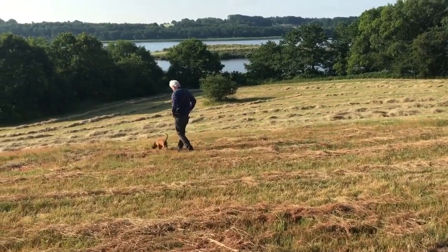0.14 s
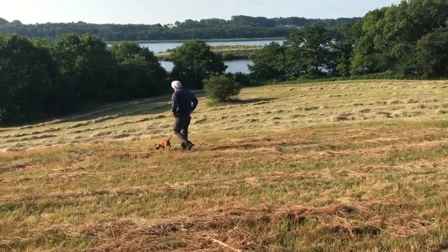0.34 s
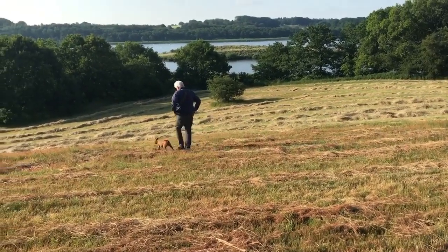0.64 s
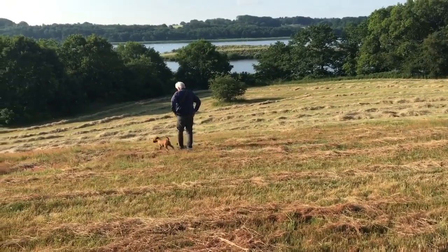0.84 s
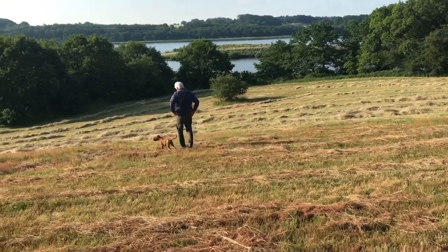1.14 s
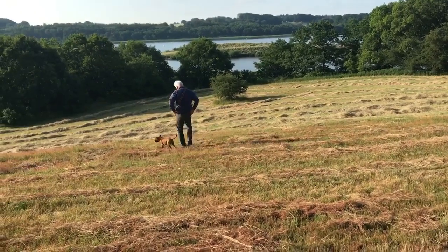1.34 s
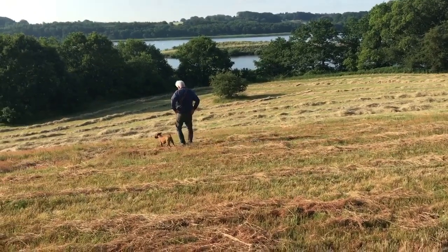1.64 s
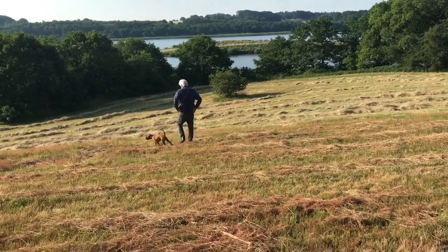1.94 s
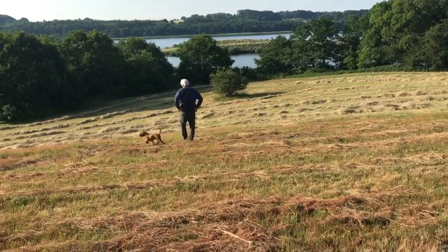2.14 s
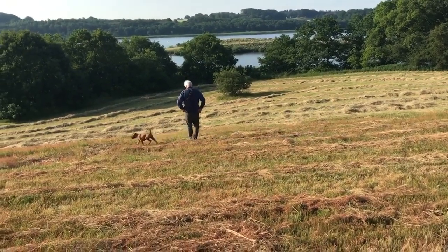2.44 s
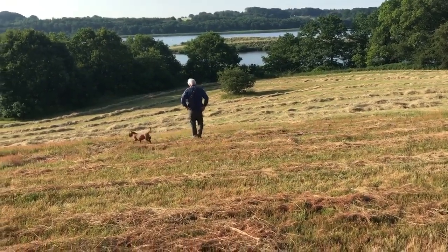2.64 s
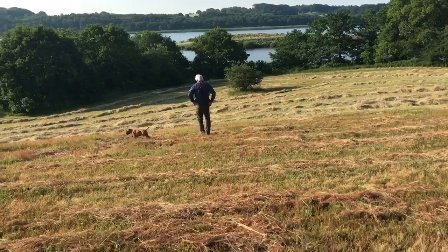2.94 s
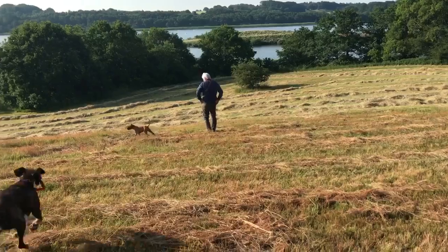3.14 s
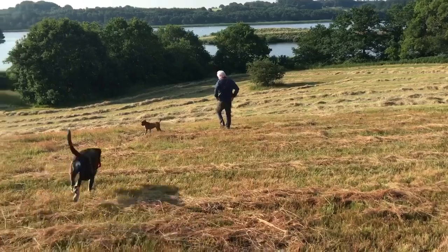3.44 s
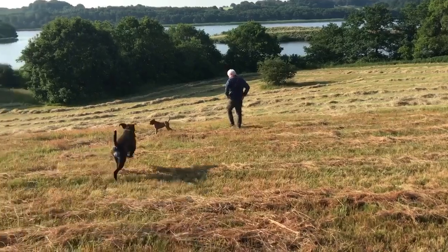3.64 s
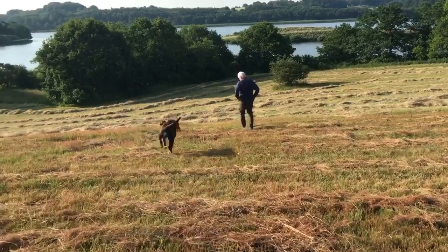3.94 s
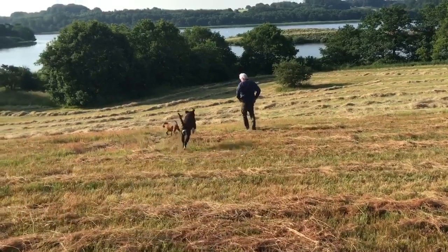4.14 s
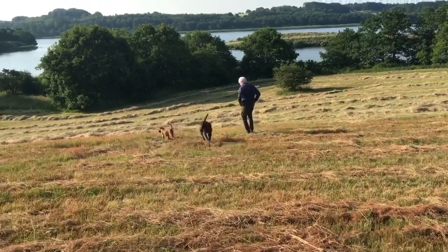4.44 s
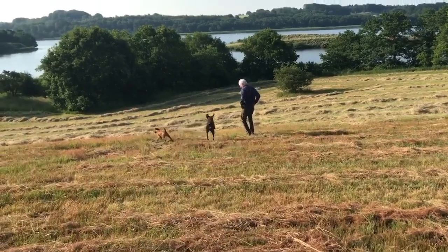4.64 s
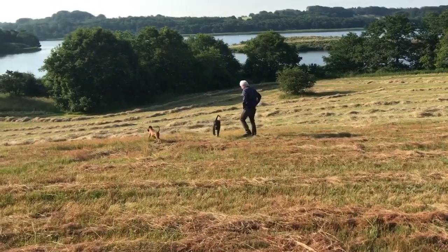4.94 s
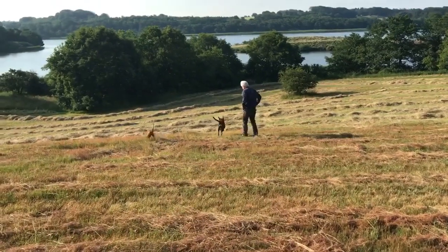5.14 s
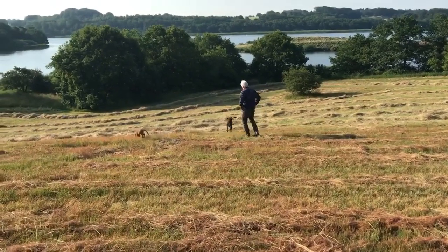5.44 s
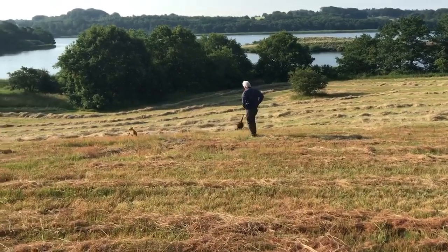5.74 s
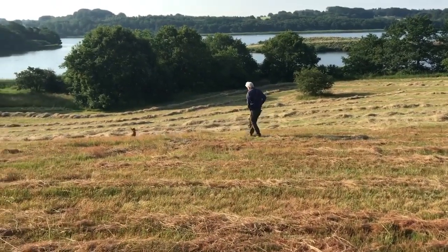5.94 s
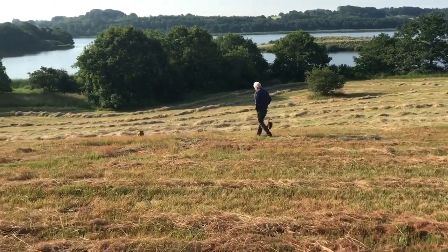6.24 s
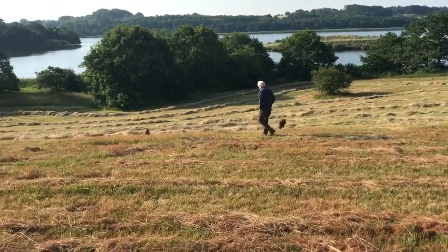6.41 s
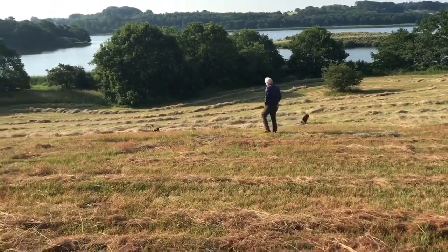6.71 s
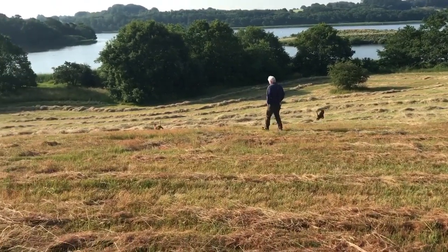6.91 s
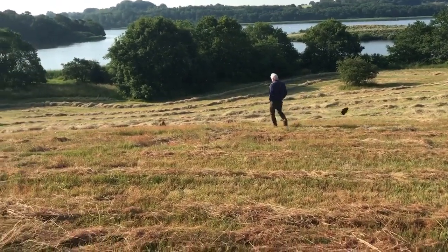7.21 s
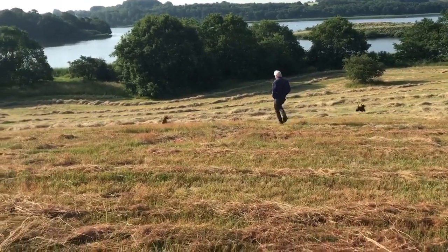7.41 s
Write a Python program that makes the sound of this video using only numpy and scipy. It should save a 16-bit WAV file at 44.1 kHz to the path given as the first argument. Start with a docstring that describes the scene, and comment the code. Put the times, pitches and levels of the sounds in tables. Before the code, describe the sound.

A quiet open field, heard in mono with a slightly dull top. Throughout, a soft wash of air and leaf hiss lies under a distant gull colony, a blurred clamour around the upper midrange with hoarse, falling cries. A far water bird gives short yelps in the first second and again around 3 to 4 s; thin songbird notes chirp here and there, weakly echoing off trees. Low wind flutters lightly at first. From about 2.3 to 2.6 s a dog's paws thud and crunch close by, dry stems cracking rapidly; its rhythmic swish peaks near 2.9 s and recedes. Wind rises from 3 s, with deep bumps, and booms heavily at 4.2 to 4.6 s. It eases after 5.2 s while gulls cry on. Small birds twitter more densely around 6.4 to 6.9 s; renewed gusts thump at 6.8 to 7.1 s, and rumble continues to the end at 7.5 s.

```python
"""Hay field above a river

Wind rumbles and bumps on the microphone: filtered noise follows the flow, and single eddies are pressure swings.
A far colony of gulls clamours on the water, as blurred gliding tones over a wash of shaped noise.
Small birds chirp in rustling trees, as thin tones that echo weakly, over patchy bands of noise.
A dog bounds past through the dry hay, as random clicks that swish, thud and crunch, with stems cracking."""
import sys
import numpy as np
from scipy import signal
from scipy.io import wavfile
from scipy.ndimage import uniform_filter1d, map_coordinates

SR = 44100
rng = np.random.default_rng(int(sys.argv[2]) if len(sys.argv) > 2 else 0)


def to_wav(s):
    """Save 16-bit WAV."""
    ch = np.atleast_2d(s).T  # columns
    pcm = np.round(np.clip(ch, -1, 1) * 32767)  # PCM
    wavfile.write(sys.argv[1], SR, pcm.astype(np.int16))


N = 333881
TIME = np.arange(N) / SR

# low wash of the open air: (time [s], level before the scene's trim [dB])
AIR_LEVEL = [(0, -60), (.6, -58.5), (1.3, -59.5), (2.3, -59.5), (2.8, -56.5), (3.5, -56.5), (4.5, -57),
             (5.3, -57.5), (6.5, -57.5), (7.57, -59)]
# colour of the air: (frequency [Hz], density [dB per Hz, relative])
AIR_COLOUR = [(100, -7.5), (200, -11), (320, -8.5), (430, -14.5), (600, -2.5), (800, -7), (1000, 2),
              (1300, -4), (2000, 2), (3000, -25)]
# a faint far drone: (time [s], level [dB])
DRONE_LEVEL = [(0, -70.5), (.8, -70.5), (2.2, -68), (3.2, -73.5), (4.5, -82.5), (7.57, -77.5)]
# colour of the drone: (frequency [Hz], density [dB per Hz, relative])
DRONE_COLOUR = [(130, 1), (170, 3.5), (240, -2.5), (330, 3.5), (420, -7.5)]
# swells of rustling in the trees: (time of peak [s], length [s], level before the scene's trim [dB])
RUSTLES = [(.37, 0.9, -63), (3.57, 0.36, -60.5), (5.1, 0.68, -60.5), (5.7, 0.56, -62), (6.25, 0.49, -59.5),
           (6.76, 1, -61), (7.08, 0.4, -59.5)]
# colour of the leaves: (frequency [Hz], density [dB per Hz, relative])
LEAF_COLOUR = [(1500, -3.5), (2600, 6), (3300, 1.5), (4000, 4), (4600, 3.5), (5000, -2.5), (5700, -2.5),
               (6500, -13), (7200, -14), (7800, -19), (9000, -22)]
# clamour of the gull colony: (time [s], gain on cries and wash [dB])
CLAMOUR = [(0, -50.5), (.35, -51.5), (.75, -55.5), (1.55, -55), (1.8, -51), (2.4, -53.5), (3.3, -51),
           (4.2, -53), (4.8, -49), (5.5, -53.5), (6.2, -50.5), (6.8, -51.5), (7.57, -51.5)]
# colour of the colony's wash: (frequency [Hz], density [dB per Hz, relative])
COLONY_COLOUR = [(1000, -33), (1350, -8), (1600, 1.5), (1830, 3), (2150, -1), (2500, -16), (3200, -39.5),
                 (4500, -44)]
# a blurred burst of twittering: (time [s], level before flutter [dB])
CHATTER = [(0, -94), (6.3, -80), (6.6, -71), (6.78, -56.5), (6.88, -65.5), (7.1, -74.5), (7.57, -69)]
# nearer gulls: (start [s], length [s], starting pitch before the bend [Hz], level [dB], rasp [ratio])
GULLS = [(0.02, 0.2, 1730, -64, .9), (0.1, 0.28, 2127, -57, .7), (0.43, 0.23, 1930, -60, .7),
         (0.75, .16, 2020, -60, .7), (1.04, 0.21, 1740, -59.5, .9), (1.2, 0.32, 1946, -58, .7),
         (1.38, 0.13, 1866, -55, .5), (1.6, 0.19, 1926, -59.5, 1.2), (2.15, .25, 1670, -56, .8),
         (2.7, 0.42, 1690, -56, .9), (2.92, 0.2, 2200, -58, 1.8), (3.08, 0.46, 1883, -55.5, .6),
         (3.4, 0.3, 1740, -57, .7), (3.35, 0.28, 1437, -60.5, 1), (3.82, 0.24, 1606, -58.5, 1.2),
         (4.14, 0.16, 2030, -57.5, 1.2), (4.46, .16, 2160, -55, 1.8), (4.63, 0.31, 1901, -53, 0.986),
         (4.72, .28, 1877, -50, 0.51), (5.13, 0.32, 2330, -55, 2.5), (5.18, 0.24, 2170, -57, 2.5),
         (5.6, 0.087, 1970, -53.5, 1), (5.61, 0.14, 1730, -53.5, 1.3), (5.88, .2, 2020, -54.5, 2),
         (5.96, 0.13, 1760, -59, 1.2), (6.03, 0.16, 1860, -52, .9)]
# short yelps of a far water bird: (time of middle [s], middle pitch before the bend [Hz], level [dB],
# rasp [ratio])
YELPS = [(.04, 740, -56, 2.7), (.41, 1000, -57, 1.95), (0.731, 1017, -57.5, 2), (1.03, 1004, -57.5, 1.4),
         (2.92, 974, -60, 1.8), (3.1, 874, -60.5, 1.5), (3.33, 985, -56.5, 1.35), (3.46, 838, -59.5, 1.5),
         (3.61, 936, -58, 1.1), (3.87, 918, -60.5, 1.8), (3.97, 920, -63, 1.4), (4.12, 900, -59.5, 2),
         (4.25, 978, -62.5, 1.35), (5.42, 1060, -58.5, 1.8)]
# thin songbird notes: (start [s], length [s], start pitch before the bend [Hz],
# end pitch before the bend [Hz], level [dB], rasp [ratio])
CHIRPS = [(.27, 0.21, 3130, 2920, -63, .7), (.75, 0.11, 4040, 4020, -64.5, .7),
          (0.789, 0.16, 2750, 2520, -61, 1), (1.5, 0.19, 2620, 2770, -61.5, 1.3),
          (2.15, .03, 6560, 6590, -68.5, .5), (2.544, 0.0182, 6750, 6550, -62, .8),
          (2.603, 0.0203, 6580, 6600, -62, .5), (2.8, 0.077, 3020, 2870, -59.5, .3),
          (3.023, 0.014, 6470, 6440, -50, .3), (3.036, 0.028, 6650, 6375, -55, .5),
          (3.36, 0.0143, 5460, 6400, -59, .6), (4.524, 0.013, 6350, 6580, -64.5, .5),
          (4.736, 0.094, 4540, 4390, -63, .7), (4.999, 0.081, 3212, 3380, -60.5, .6),
          (5.007, 0.12, 4440, 4270, -60, .8), (5.03, 0.11, 5450, 5480, -66.5, .7),
          (5.39, .09, 5600, 5560, -68, .5), (5.445, 0.058, 3460, 3350, -63, .4),
          (5.545, 0.17, 4740, 4620, -63.5, .5), (5.734, .05, 5460, 4924, -62, 1.2),
          (5.73, .1, 2850, 2900, -61, .8), (6.095, 0.019, 7410, 6200, -68, 1.5),
          (6.13, 0.14, 2950, 2800, -61.5, 1.3), (6.425, 0.025, 6500, 5200, -61, 1.5),
          (6.417, 0.1, 4540, 4340, -61, .7), (6.567, 0.094, 6170, 6900, -68.5, .6),
          (6.653, .07, 6760, 6300, -62.5, .7), (6.58, 0.091, 4500, 4780, -63.5, .7),
          (6.702, 0.16, 4720, 4500, -62, .8), (6.762, .036, 5790, 4950, -57, .6),
          (7.445, 0.11, 4740, 4610, -63, .5)]
# a songbird's upslurred call: (time of steepest rise [s], scoop time [s], level [dB], rasp [ratio])
SLURS = [(3.03, .012, -58.5, .6), (4.157, 0.0021, -54, .15)]
# near footfalls and brushes through the hay: (start [s], length [s], pad thud level [dB],
# crunch level before clumping [dB], crisp top level before clumping [dB])
PAWS = [(2.324, 0.078, -58, -64, -68), (2.365, 0.054, -60, -57, -73), (2.478, 0.05, -59, -59, -88),
        (2.536, .035, -65, -66, -68), (2.555, 0.08, -66, -54, -76), (2.836, 0.092, -76, -62, -64),
        (3.005, 0.093, -78, -67, -64)]
# stiff stems that break under a paw: (time [s], low knock peak [dB], crack peak [dB])
CRACKS = [(2.345, -45, -51), (2.366, -53, -48), (2.374, -52, -42), (2.396, -47, -40), (2.475, -43, -52),
          (2.49, -52, -44), (2.498, -49, -44), (2.564, -49, -46), (2.576, -54, -44), (2.591, -54, -37),
          (2.597, -48, -43), (2.62, -51, -45)]
# the breeze on the microphone: (time [s], flow strength before flutter [dB])
BREEZE = [(0, -56.5), (.6, -57), (.95, -64), (1.4, -57), (2.0, -58.5), (2.7, -58), (3.2, -53), (3.75, -52),
          (4.2, -41.5), (4.87, -47), (5.9, -49), (6.2, -45.5), (7.57, -47.5)]
# gusts that swell and die away on top of it: (time of peak [s], length [s], flow strength [dB])
GUSTS = [(.21, 0.06, -49), (1.38, 0.07, -53), (1.63, 0.16, -50.5), (1.98, 0.11, -50), (2.39, 0.078, -48),
         (2.87, 0.18, -46.5), (3.14, 0.22, -41), (3.28, 0.2, -38.5), (3.46, 0.1, -41.5),
         (3.67, 0.12, -42.5), (4.0, 0.18, -39), (4.26, 0.15, -28), (4.45, 0.33, -29), (4.6, 0.13, -35.5),
         (4.76, 0.12, -38.5), (5.06, 0.2, -37), (5.38, 0.13, -45.5), (6.26, 0.087, -43), (6.43, 0.059, -46),
         (6.62, 0.12, -41.5), (6.97, 0.24, -39), (7.34, 0.12, -45)]
# single eddies that hit the port: (time of middle [s], pressure before gain and filters [dB],
# middle to either pressure peak [ms], peak of turbulence within it before filters [dB])
BUFFETS = [(1.629, -38, 4.4, -72), (3.118, -36.5, 3.8, -68), (3.19, -36, 1.75, -55),
           (3.266, -31.5, 3.1, -57), (3.346, -36.5, 3.1, -65), (4.0, -32, 2.5, -61),
           (4.247, -26.5, 1.2, -36), (4.257, -18.5, 3.1, -43), (4.366, -27.5, 2.6, -72),
           (4.457, -29.5, 1.8, -50), (4.467, -25, 1.45, -45), (4.483, -30.5, 2.8, -48),
           (4.496, -29.5, 1.36, -52), (4.508, -29.5, 2.1, -58), (4.547, -29.5, 1.86, -52),
           (4.561, -20.5, 2.7, -42), (4.575, -24, 2.6, -56), (4.63, -32.5, 3.6, -65),
           (5.077, -33.5, 3.2, -65), (5.105, -33.5, 2.6, -65), (5.679, -36, 2.14, -60),
           (5.765, -35, 4.4, -70), (6.26, -37, 5.8, -70), (6.431, -37, 3, -64), (6.828, -27, 1.9, -52.5),
           (6.985, -28.5, 3.1, -43), (6.993, -37, 0.86, -31), (7.005, -38, 1.9, -49),
           (7.016, -35.5, 1.2, -39), (7.022, -24, 3, -57), (7.133, -24.5, 4.6, -72.5)]

LEAF_DB, LEAF_FADE_DB_PER_S = -61, 0.1   # steady hiss of the wood before the trim; it fades slowly
GULL_FALL_PER_S = .2   # share of its pitch that a cry loses each second
GULL_SCATTER, YELP_SCATTER, CHIRP_SCATTER = 94.8, 130.6, 299.6   # random points per second at rasp 1
STRIDE_S, STRIDE_SWING_DB, FIRST_STRIDE_S = 0.2258, 3.5, 2.1   # the swish pulses as the dog bounds
PASS_S, PASS_DB = 2.89, -72.75   # when the dog is nearest, and the swish the strides swing around
APPROACH_DB_PER_S, LEAVE_DB_PER_S = 17.5, 7.5
SWISH_CRUNCH_DB = -5   # crunch within the swish
FLUTTER_DB, FLUTTER_PER_S = 2.5, 20   # the flow is never even
PORT_LOW_HZ = 37   # the microphone's bass cut
CUTOFF_HZ = 9080


def from_db(db):
    """Decibels to gain."""
    return 10 ** (np.asarray(db) / 20)


def rms_one(x):
    """Scale to an rms of one."""
    return x / np.sqrt(np.mean(x ** 2) + 1e-20)


def in_time(rows):
    """The level of a two-column curve at every sample."""
    s, level = np.transpose(rows)
    return np.interp(TIME, s, level)


def cut(x, hz, kind, order=2):
    """Butterworth filter."""
    return signal.sosfilt(signal.butter(order, hz, kind, fs=SR, output="sos"), x + 1e-18)


def drift(rate, size=N):
    """Smooth motion through normally spread random points, so many a second."""
    at = np.arange(size) * rate / SR
    return map_coordinates(rng.standard_normal(int(at[-1]) + 4), [at + 1], order=2, mode="nearest")


def add(out, s, sound):
    """Mix a sound in from a given time."""
    start = max(round(s * SR), 0)
    out[start:start + len(sound)] += sound[:max(N - start, 0)]


def swells(rows):
    """Summed power of bell-shaped swells, each about 21 dB down half its length from the peak."""
    power = np.zeros(N)
    for s, length, db in rows:
        power += from_db(db) ** 2 * np.exp(-2 * np.pi ** 2 * ((TIME - s) / length) ** 2)
    return power


def shaped_noise(colour, patchy_db, patch_rate):
    """Noise in roughly quarter-octave bands, each swelling and fading on its own; rms 1."""
    hz, db = np.transpose(colour)
    edges = np.geomspace(hz[0], hz[-1], int(4 * np.log2(hz[-1] / hz[0])) + 1)
    white = rng.standard_normal((2, N))   # neighbouring bands take turns
    out = np.zeros(N)
    for k, (low, high) in enumerate(zip(edges, edges[1:])):
        level_db = np.interp(np.log(low * high) / 2, np.log(hz), db)
        swell = np.interp(TIME * patch_rate, np.arange(1000), rng.standard_normal(1000))
        band = cut(white[k % 2], [low, high], "band", order=3)
        out += from_db(level_db + patchy_db * swell) * band
    return rms_one(out)


def arch(length):
    """Progress 0-1 through a sound, and its rounded rise and fall."""
    progress = np.linspace(0, 1, max(int(length * SR), 8))
    return progress, np.sin(np.pi * progress)


def hoarse(hz, rasp, rasp_hz):
    """A tone on a pitch track, rms 1; rasp scatters it into a narrow band."""
    scatter = drift(rasp_hz, size=len(hz)) + 1j * drift(rasp_hz, size=len(hz))
    tone = np.exp(2j * np.pi * np.cumsum(hz) / SR)
    return rms_one(np.real((1 + rasp * scatter) * tone))


def cry(length, start_hz, end_hz, rasp, rasp_hz, bend=.012):
    """A gliding tone that bends upward as it swells."""
    progress, swell = arch(length)
    glide_hz = start_hz + (end_hz - start_hz) * progress
    return swell * hoarse(glide_hz * (1 + bend * (swell - .5)), rasp, rasp_hz)


def open_air(trim_db=1.5):
    """The wash of the open air: patchy noise that rises and falls slowly."""
    return from_db(in_time(AIR_LEVEL) + trim_db) * shaped_noise(AIR_COLOUR, patchy_db=2.07, patch_rate=10)


def far_drone():
    """A faint drone: low noise whose bands waver slowly."""
    return from_db(in_time(DRONE_LEVEL)) * shaped_noise(DRONE_COLOUR, patchy_db=1.5, patch_rate=4.4)


def leaves(trim_db=0.75):
    """Leaves hiss steadily and rustle in swells: many small contacts heard as patchy high noise."""
    steady = from_db(LEAF_DB - LEAF_FADE_DB_PER_S * TIME)
    hiss = np.sqrt(steady ** 2 + swells(RUSTLES))
    return from_db(trim_db) * hiss * shaped_noise(LEAF_COLOUR, patchy_db=2.14, patch_rate=27)


def colony(count=130, centre_hz=1830, spread=.10, fall=.07, cries_db=-6.5, blur_db=-4.0):
    """Overlapping gull cries above a wash of others blurred by distance."""
    cries = np.zeros(N)
    starts = (np.arange(count) + rng.random(count)) * TIME[-1] / count
    lengths = rng.uniform(0.1167, .35, count)
    pitches = rng.standard_normal(count)
    for s, length, pitch in zip(starts, lengths, pitches):
        hz = centre_hz * np.exp(spread * pitch)
        add(cries, s, cry(length, hz, hz * (1 - fall), rasp=0.5, rasp_hz=80.1))
    wash = shaped_noise(COLONY_COLOUR, patchy_db=0.5, patch_rate=8)
    clamour = from_db(cries_db) * rms_one(cries) + from_db(blur_db) * wash
    return from_db(in_time(CLAMOUR)) * clamour


def twitter(count=110, softest_db=-73.5, range_db=4.0):
    """Many more songbirds, barely standing out of the leaves: a blurred band and short random chirps."""
    blur = rms_one(cut(rng.standard_normal(N), [4300, 6200], "band", order=3))
    out = from_db(in_time(CHATTER) + 2 * drift(60)) * blur
    for when, pitch, length, glide, size in rng.random((count, 5)):
        hz = 2400 * 1.7 ** pitch
        end_hz = hz * (1 + 0.21 * (glide - .6))
        chirp = cry(.03 + 0.083 * length, hz, end_hz, rasp=0.8, rasp_hz=168)
        add(out, when * TIME[-1], from_db(softest_db + range_db * size) * chirp)
    return out


def yelps(length=0.099, fall=.05):
    """A far water bird's short hoarse yelps, gliding down through their middle pitch."""
    out = np.zeros(N)
    for s, hz, db, rasp in YELPS:
        yelp = cry(length, hz * (1 + fall), hz * (1 - fall), rasp, YELP_SCATTER * rasp)
        add(out, s - length / 2, from_db(db) * yelp)
    return out


def near_gulls():
    """Hoarse falling gull cries; the raspier a cry, the wider its band."""
    out = np.zeros(N)
    for s, length, hz, db, rasp in GULLS:
        end_hz = hz * (1 - GULL_FALL_PER_S * length)
        add(out, s, from_db(db) * cry(length, hz, end_hz, rasp, GULL_SCATTER * rasp))
    return out


def chirps():
    """Thin gliding songbird whistles; rasp widens each into a band."""
    out = np.zeros(N)
    for s, length, start_hz, end_hz, db, rasp in CHIRPS:
        add(out, s, from_db(db) * cry(length, start_hz, end_hz, rasp, CHIRP_SCATTER * rasp))
    return out


def slurs(low_hz=3400, top_hz=4400, creep_hz_per_s=13000, lead_s=0.065, hold_s=0.033, start_share=0.34):
    """The note starts soft and climbs gently, scoops up, and is loudest as it creeps on at the top."""
    out = np.zeros(N)
    t = np.arange(-lead_s, hold_s, 1 / SR)
    for s, scoop_s, db, rasp in SLURS:
        rise = 1 / (1 + np.exp(-t / scoop_s))
        swell = (start_share + (1 - start_share) * rise) * signal.windows.tukey(len(t), .25)
        hz = low_hz + (top_hz - low_hz) * rise + creep_hz_per_s * t   # creep adds to both ends
        add(out, s - lead_s, from_db(db) * swell * hoarse(hz, rasp, rasp_hz=400))
    return out


def tree_echoes(x, echo_db=-19, count=8):
    """A few weak, dull returns from the edge of the wood."""
    out, dull = x.copy(), cut(x, 4500, "low")
    for lag in rng.uniform(.02, .16, count):
        add(out, lag, from_db(echo_db) * dull)
    return out


def snaps(per_s, low_hz, high_hz):
    """Sparse random clicks heard in one band, as of stalks breaking; rms 1."""
    clicks = (rng.random(N) < per_s / SR) * rng.uniform(-0.99, 1, N)
    return rms_one(cut(clicks, [low_hz, high_hz], "band"))


def paws(clump_db=3.0, clump_per_s=170):
    """The dog swishes past through stalks that break in clumps; near footfalls thud and crunch."""
    thud, crunch, crisp = np.zeros((3, N))
    for s, length, thud_db, crunch_db, crisp_db in PAWS:
        press = arch(length)[1]
        add(thud, s, from_db(thud_db) * press)
        add(crunch, s, from_db(crunch_db) * press)
        add(crisp, s, from_db(crisp_db) * press)
    away_db = np.maximum(APPROACH_DB_PER_S * (PASS_S - TIME), LEAVE_DB_PER_S * (TIME - PASS_S))
    stride = np.cos(2 * np.pi * (TIME - FIRST_STRIDE_S) / STRIDE_S)
    swish = from_db(PASS_DB - away_db + STRIDE_SWING_DB * stride)
    crunch_level = crunch + from_db(SWISH_CRUNCH_DB) * swish
    stalks = crunch_level * snaps(per_s=380, low_hz=1710, high_hz=3330)
    stalks += (swish + crisp) * snaps(per_s=6000, low_hz=5460, high_hz=9100)
    clumps = from_db(clump_db * drift(clump_per_s))
    return thud * snaps(per_s=450, low_hz=288, high_hz=805) + clumps * stalks


def cracks(knock_s=0.0033, crack_s=0.003, knock_band_hz=(380, 850), crack_band_hz=(1700, 3700)):
    """A stem breaks fibre by fibre in a sharp crack, and the mat of hay under it gives a dull knock."""
    out, t = np.zeros(N), TIME[:2000]
    for s, knock_db, crack_db in CRACKS:
        parts = ((knock_db, knock_s, knock_band_hz), (crack_db, crack_s, crack_band_hz))
        for db, decay_s, band in parts:
            fibres = rng.standard_normal(len(t)) ** 5   # the power leaves a few spikes standing out
            burst = cut(fibres * np.exp(-t / decay_s), band, "band", order=3)
            add(out, s - .002, from_db(db) * burst / np.abs(burst).max())
    return out


def wind_db():
    """Strength of the flow: a fluttering breeze plus the gusts, summed as power."""
    breeze = from_db(in_time(BREEZE) + FLUTTER_DB * drift(FLUTTER_PER_S))
    return 10 * np.log10(breeze ** 2 + swells(GUSTS))


def rumble(eddy_hz=80, fine_hz=200, fine_db=-20, steepen=0.51, strong_db=-35, trim_db=-0.97):
    """Turbulence on the port, capped in strength; stronger flow breaks into finer, higher eddies."""
    level_db = np.minimum(wind_db(), strong_db)
    large = cut(rng.standard_normal(N), eddy_hz, "low", order=4)
    large = cut(large, PORT_LOW_HZ, "high", order=6)
    large /= np.sqrt(uniform_filter1d(large ** 2, size=3000) + 1e-12)   # the flow sets the strength
    fine = cut(rng.standard_normal(N), fine_hz, "low", order=3)
    fine = rms_one(cut(fine, eddy_hz, "high"))
    fine *= from_db(fine_db + steepen * (level_db - strong_db) + 0.75 * drift(25))
    return from_db(level_db + trim_db) * (large + fine)


def buffets(turbulence_band_hz=(240, 370), burst_s=0.0051, soft_hz=650):
    """An eddy swings the pressure up and back with turbulence inside; the bass cut adds to the swing."""
    out, span = np.zeros(N), .03
    t = np.arange(-span, span, 1 / SR)
    for s, db, half_ms, turbulence_db in BUFFETS:
        u = t * 1000 / half_ms
        lump = np.exp(-u ** 2 / 2) * -u
        turbulence = cut(rng.standard_normal(len(t)), turbulence_band_hz, "band")
        ragged = np.exp(-(t / burst_s) ** 2) * turbulence
        ragged /= np.abs(ragged).max()
        add(out, s - span, 1.76 * from_db(db) * lump + from_db(turbulence_db) * ragged)
    return cut(cut(out, PORT_LOW_HZ, "high", order=4), soft_hz, "low", order=3)


def scene():
    """Far air and birds, the dog in the hay, and wind at the microphone, in one channel."""
    background = open_air() + far_drone() + leaves() + colony()
    songs = tree_echoes(twitter() + yelps() + near_gulls() + chirps() + slurs())
    dog = paws() + cracks()
    wind = rumble() + buffets()
    return (background + songs + dog + wind)[None]


def record(dry):
    """The top is cut steeply by an elliptic low-pass."""
    return signal.sosfilt(signal.ellip(12, .1, 80, CUTOFF_HZ, fs=SR, output="sos"), dry)


dry = scene()
out = record(dry)
to_wav(out)
```